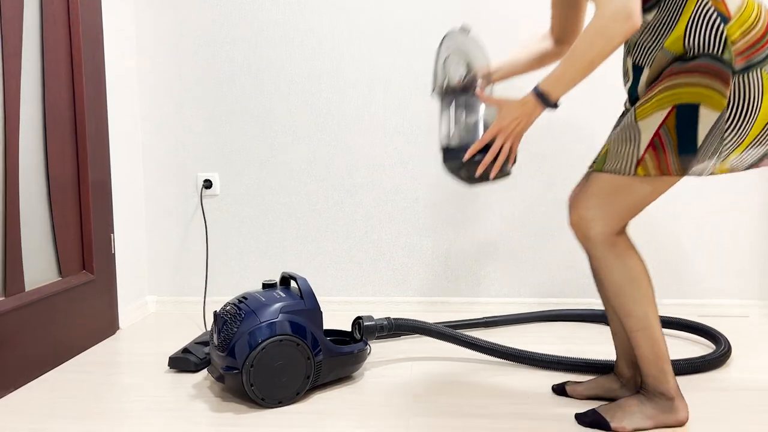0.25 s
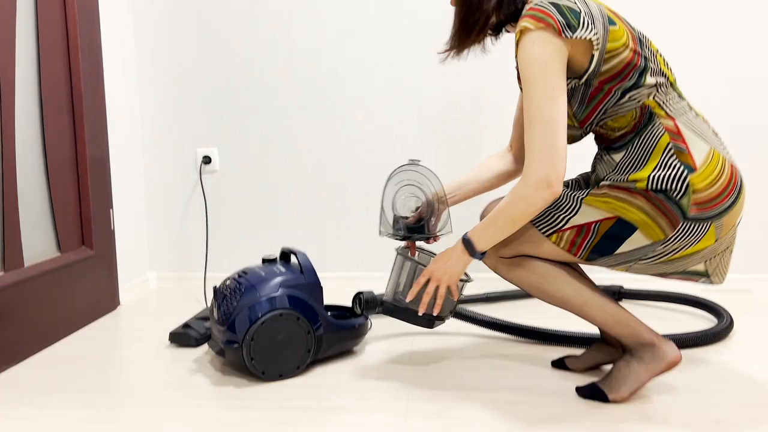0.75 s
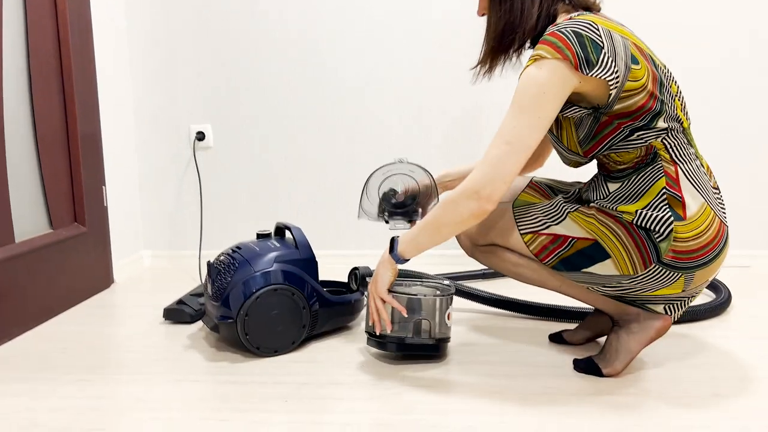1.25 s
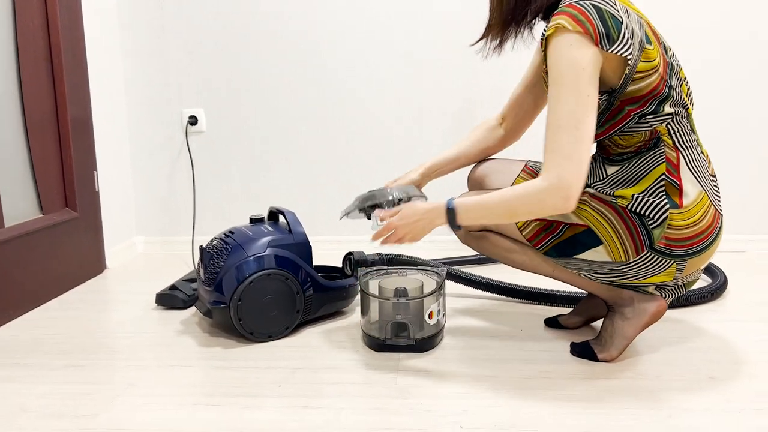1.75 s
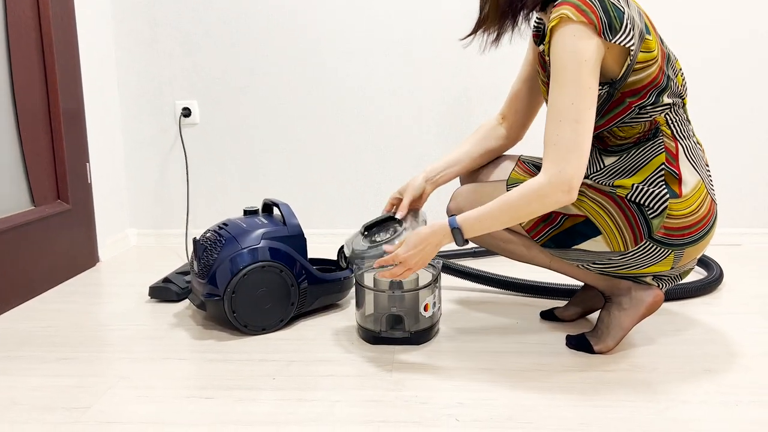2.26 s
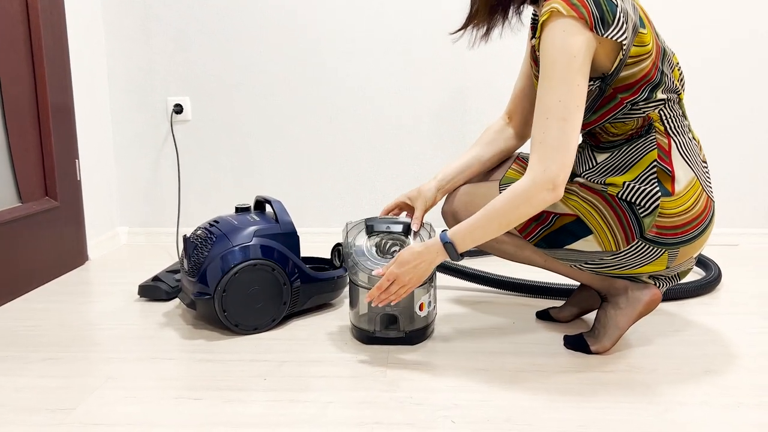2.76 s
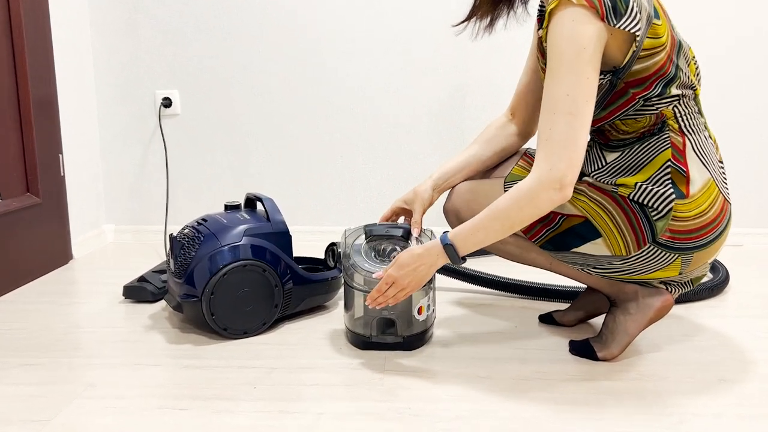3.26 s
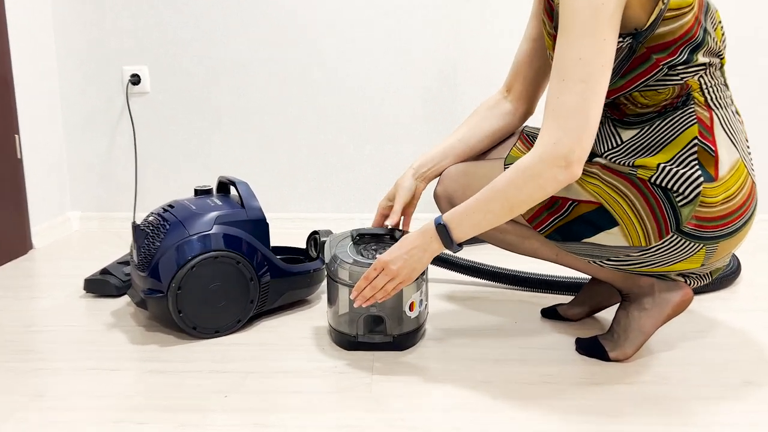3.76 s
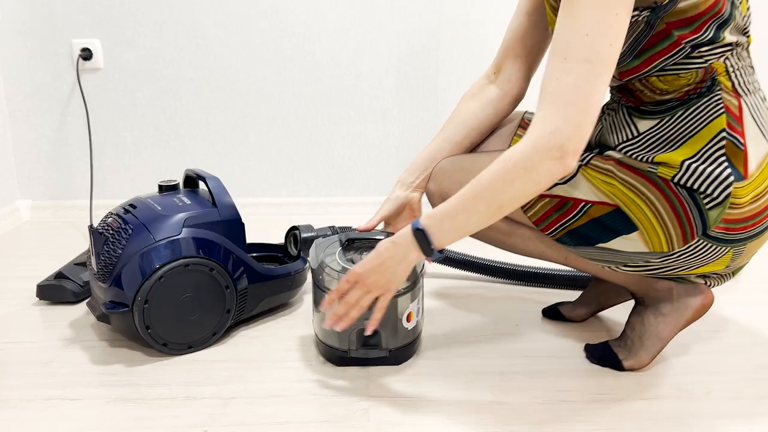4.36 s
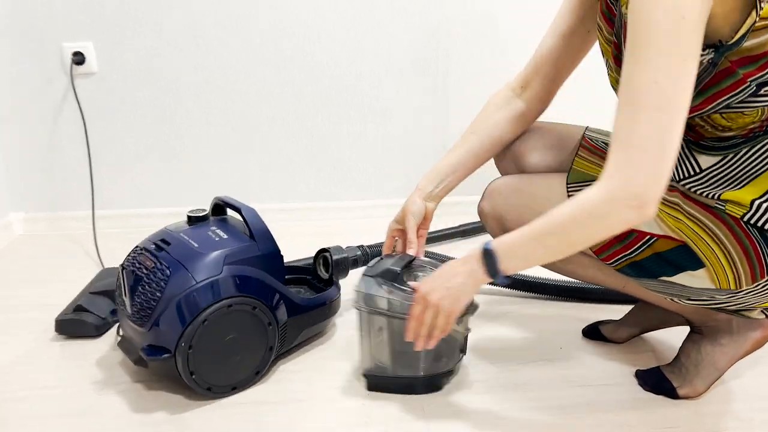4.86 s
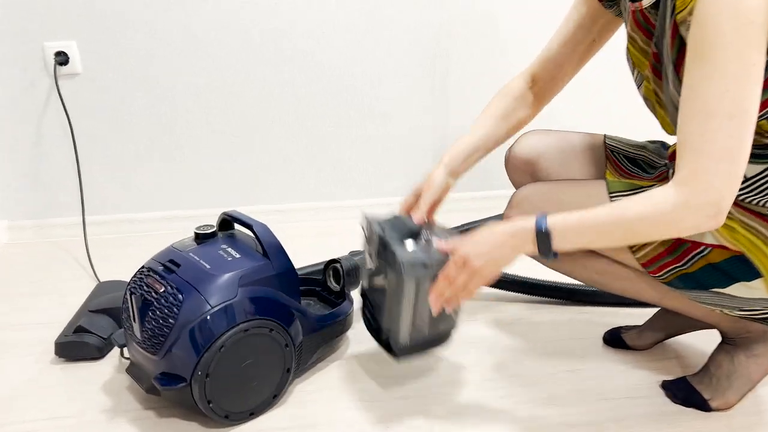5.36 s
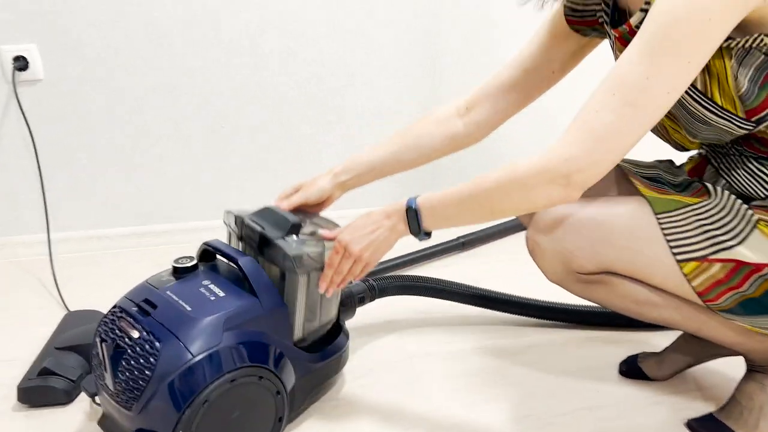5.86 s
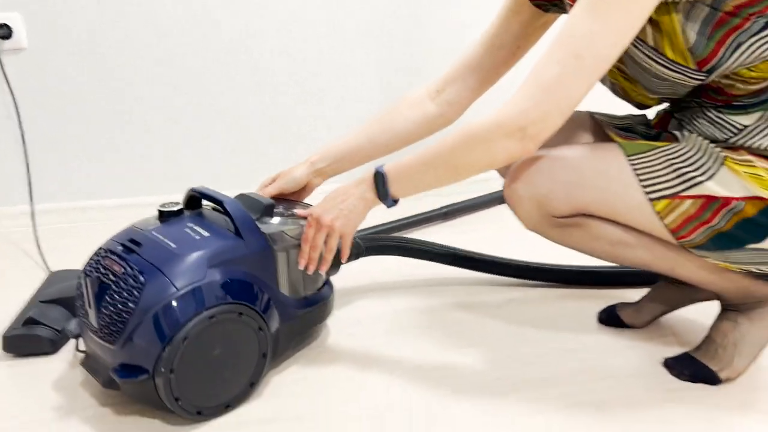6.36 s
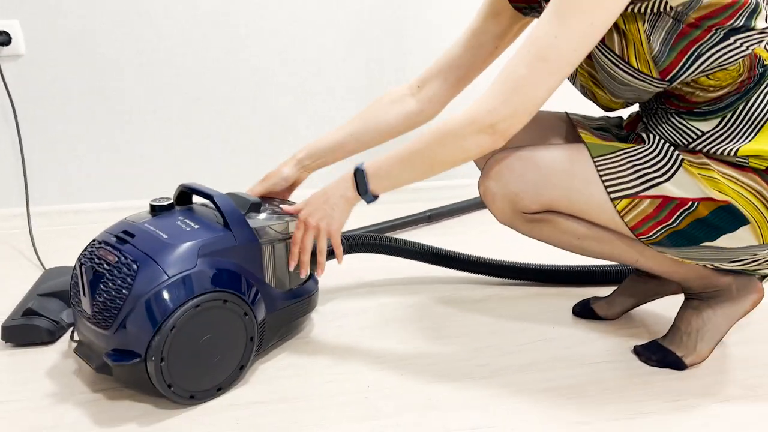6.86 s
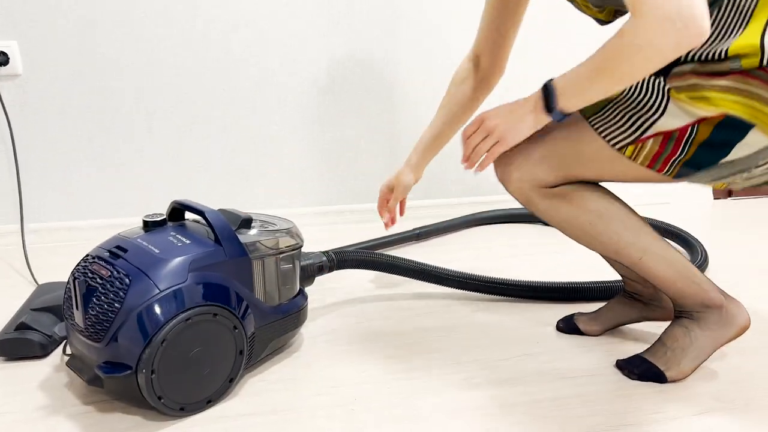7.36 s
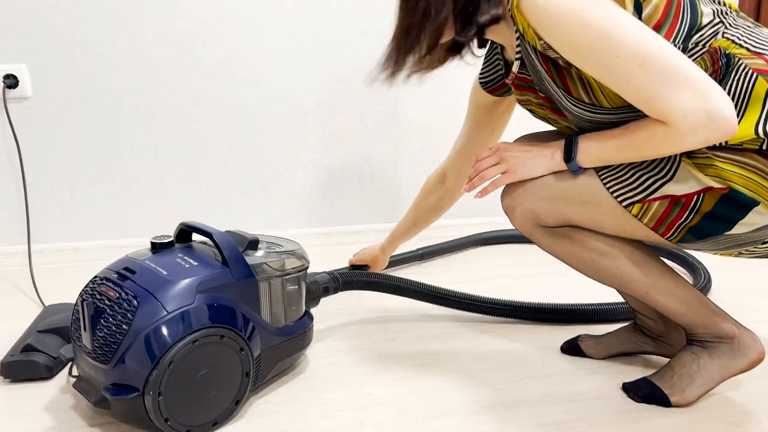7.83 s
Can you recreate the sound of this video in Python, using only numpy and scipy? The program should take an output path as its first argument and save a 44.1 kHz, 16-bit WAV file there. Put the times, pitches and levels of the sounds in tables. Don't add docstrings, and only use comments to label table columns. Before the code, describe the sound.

Low steady house hum in a small bare room with a short bright echo, captured close by a stereo phone. At 0 s a soft knock and rubbing, then faint rustles. Around 1.05-1.3 s loose plastic clatters in the hands, with a sharp bright crack at 1.13. At 1.5-1.65 s the hollow bin is set on laminate in a few dull, round thumps. From 2.0 to 2.55 s the lid is turned with light ticks and faint squeaks; quieter touches follow. Knocks at 3.6-3.85 s lead to a loud hollow snap at 4.04. Stiff clunks and rubbing continue from 4.35 to 5.27 s. The bin knocks the cleaner at 5.83, slides home with scraping clunks and sinking hollow notes at 6.0-6.2, and latches with a hard clack at 6.58. Near quiet, then hose clicks, squeals and rattles from 7.75 to the end around 8 s.

```python
import sys
import numpy as np
from scipy import signal
from scipy.fft import rfft, irfft, next_fast_len
from scipy.io import wavfile

SR = 44100
rng = np.random.default_rng(int(sys.argv[2]) if len(sys.argv) > 2 else 0)


def convert_level_to_amplitude(level_db):
    exponent = np.asarray(level_db, float) / 20
    return 10 ** exponent


def digitize_waveform(pressure):
    field = np.atleast_2d(pressure).T
    bounded = np.clip(field, -1, 1)
    quanta = np.round(bounded * 32767).astype(np.int16)
    wavfile.write(sys.argv[1], SR, quanta)


N = 356945

# pitch in Hz, level in dB, t60 in seconds.
BIN_BODY = [
    [(1360, 5.5, 0.01), (1563, 7.5, 0.014), (1670, -6, 0.017), (1805, -11, 0.011), (1850, -9, 0.1),
     (2070, -5.5, 0.0058), (2427, -9, 0.019), (2800, -10, 0.023)],
    [(60.6, -17.5, 0.12), (89.5, 6.5, 0.11)],
    [(166.4, -6.5, 0.23), (214, 9, 0.016), (298, 2.5, 0.035), (347, 1, 0.048)],
    [(504, -9, 0.016), (701, 0, 0.074), (871, 11, 0.0086), (1040, -9, 0.039)],
]
# rise in seconds, fall in seconds, trim in dB.
CONTACT_CHATTER = [
    (0.039, 0.0042, -1.5),
    (0.0087, 0.0044, -1.5),
    (0.017, 0.0045, -1.5),
    (0.0003, 0.0096, 1),
    (0.0092, 0.0035, 2.5),
]


def at_hz(points, hz):
    p = np.array(points, float)
    return np.interp(np.log(hz + 1), np.log(p[:, 0] + 1), p[:, 1])


def rms_one(x):
    return x / np.sqrt(np.mean(x ** 2) + 1e-20)


def shaped(x, spectrum):
    size = next_fast_len(N)
    hz = np.fft.rfftfreq(size, 1 / SR)
    inside = (hz > spectrum[0][0] * .7) & (hz < spectrum[-1][0] * 1.4)
    return irfft(rfft(x, size) * convert_level_to_amplitude(at_hz(spectrum, hz)) * inside, size)[..., :N]


def ring(force, hz, t60):
    r, w = convert_level_to_amplitude(-60 / (t60 * SR)), 2 * np.pi * hz / SR
    return signal.lfilter([.5, 0, -.5], [1, -2 * r * np.cos(w), r * r], force + 1e-18)


def grains(per_s, spread_db):
    sizes = convert_level_to_amplitude(spread_db * np.minimum(rng.exponential(1, N), 4)) * rng.choice([-1, 1], N)
    return sizes * (rng.random(N) < per_s / SR)


def swell(rows):
    attack_s, release_s = 0.019, 0.038
    t = np.arange(0, N + 32, 32) / SR
    start, length = np.transpose(rows)[:2, :, None]
    attack = np.clip((t - start) / attack_s + .5, 0, 1) ** 2
    return t, attack * np.exp(-np.maximum(t - start - length, 0) / release_s)


def contacts(hits, part, size):
    evenness = .2
    rise_s, fall_s, _ = CONTACT_CHATTER[part]
    t = np.arange(size // 4) / SR
    envelope = (1 - np.exp(-t / rise_s)) * np.exp(-t / fall_s)
    chatter = rng.standard_normal((len(hits), len(t))) ** 3 * envelope
    force = rfft(chatter / np.sqrt(np.sum(chatter ** 2, axis=1, keepdims=True)), size // 2)
    even = irfft(force / np.sqrt(np.abs(force) ** 2 + evenness))[:, :len(t)]
    return rfft(even / np.sqrt(np.sum(even ** 2, axis=1, keepdims=True)), size)


def struck(hits, body, size=4096):
    # frequency in Hz, level in dB per Hz.
    tick_spectrum = [(300, -51.5), (2500, -2.5), (3500, 1), (5000, -0.5), (6000, -5), (7300, -2.5),
                     (10000, -9.5), (13000, -9.5), (15500, -19.5), (16500, -46)]
    hits, hz = np.array(hits), np.fft.rfftfreq(size, 1 / SR)
    tick_level = convert_level_to_amplitude(28.0 + at_hz(tick_spectrum, hz) + hits[:, [5]])
    blows = tick_level * contacts(hits, part=4, size=size)
    for part, modes in enumerate(body):
        trim_db = CONTACT_CHATTER[part][2]
        for mode_hz, db, t60 in modes:
            chance = rng.standard_normal((len(hits), 2))
            f = mode_hz * (1 + .02 * chance[:, :1])
            decay = np.log(1000) / t60 / (2 * np.pi)
            force = contacts(hits, part, size)
            near = np.abs(force[:, np.abs(hz - mode_hz) < 3 * decay + 12])
            force = force / np.sqrt(np.mean(near ** 2, axis=1, keepdims=True))
            force = force / (1 + 1j * hz / (2 * f)) ** 2
            level = convert_level_to_amplitude(hits[:, [1 + part]] + trim_db + db + 2.0 * chance[:, 1:])
            resonance = 1j * hz / (f ** 2 - hz ** 2 + 2j * decay * hz)
            blows += force * level * SR / (2 * np.pi) * resonance
    out = np.zeros(N + size)
    for s, blow in zip(hits[:, 0], irfft(blows, size)):
        start = round(s * SR)
        out[start:start + size] += blow
    return out[:N]


def held(hits, grip):
    # wall's share of weight against slap from 0 to 1,
    # wall level in dB, floor level in dB relative to the weight.
    grips = dict(walked_in=(0.73, 4, -39), carried=(0.26, -1.1, -2), set_down=(0.83, 0.5, -0.45),
             lid_turned=(0.53, 5.3, -24), lid=(0.26, 0, -1), bin=(1, -14.5, -15), seated=(0.13, 6.3, -10),
             latched=(0.085, -8.5, -12), hose=(0.089, 0.98, 9.6))
    s, slap, weight, edge = np.transpose(hits)
    share, wall_db, floor_db = grips[grip]
    wall = slap + share * (weight - slap) + wall_db
    return np.transpose([s, slap, weight + floor_db, weight, wall, edge])


def judder(slides, modes, per_s):
    t, shape = swell(slides)
    push = np.interp(np.arange(N) / SR, t, convert_level_to_amplitude(np.array(slides)[:, 2]) @ shape)
    knocks = sum(convert_level_to_amplitude(db) * ring(grains(per_s, spread_db=-1.5), hz, t60) for hz, db, t60 in modes)
    return push * rms_one(knocks)


def swelling_notes(rows):
    rise_cycles = 0.51
    out, t = np.zeros(N + SR // 2), np.arange(SR // 2) / SR
    for s, db, hz, t60 in rows:
        start = round(s * SR)
        envelope = convert_level_to_amplitude(db - 60 * t / t60) * (1 - np.exp(-t * hz / rise_cycles))
        out[start:start + len(t)] += envelope * np.sin(2 * np.pi * hz * t)
    return convert_level_to_amplitude(1.5) * out[:N]


def house_hum():
    # frequency in Hz, level in dB per Hz.
    hum_spectrum = [(20, 11.5), (60, 2), (170, -13), (500, -11.5), (860, -11.5), (1200, -4.5), (1550, -16),
                    (1900, -22.5), (2600, -35.5)]
    return convert_level_to_amplitude(-64) * rms_one(shaped(rng.standard_normal((2, N)), hum_spectrum))


def rubbing():
    # start in
    # seconds, length in seconds, level in dB, lightness in dB (crisp above 0, heavy below).
    strokes = [(0, 0.0029, -47.5, -1), (.09, 0.021, -55, -4), (0.161, 0.07, -57.5, 5.5),
               (0.409, 0.032, -65, 4), (0.506, 0.11, -72, 17), (0.678, 0.059, -77.5, 12),
               (0.816, 0.16, -76.5, 11), (1.052, 0.049, -48, 4), (1.19, 0.23, -55.5, -6),
               (1.51, 0.21, -67.5, -15.5), (2.04, 0.16, -60, 10), (2.3, 0.38, -66, 4.5),
               (3.62, 0.144, -63, 0), (3.709, 0.055, -46.5, 0.5), (3.84, 0.094, -52, 1),
               (4.11, 0.34, -53, 0), (4.5, 0.4, -57.5, -3), (4.951, 0.17, -52, -7.5),
               (5.179, 0.082, -54.5, -1.5), (5.33, 0.16, -66, 3), (5.706, 0.088, -58.5, 4.5),
               (5.86, 0.076, -50.5, -6), (5.99, 0.21, -46, -5.5), (6.2, 0.053, -66, -11),
               (6.701, 0.21, -59.5, -2.5), (7.769, 0.069, -47, 1), (7.86, 0.15, -58, -10),
               (7.97, .2, -52, -6.5),
               (2.716, 0.048, -63, -8.5), (2.876, 0.23, -70, -5), (3.184, 0.19, -74.5, -12),
               (3.43, 0.47, -73, -7), (4.337, 0.038, -74, 13), (4.584, 0.0047, -72, -4),
               (4.783, 0.011, -53, 0), (4.872, 0.067, -62, 10), (4.99, 0.0074, -63.5, -17),
               (5.447, 0.34, -72, 3), (6.302, 0.42, -72.5, -6), (7.057, 0.21, -79.5, 11.5),
               (7.72, 0.047, -80.5, 15), (7.402, 0.12, -84.5, 10), (7.55, 0.049, -79, 11),
               (1.767, 0.32, -81.5, 7)]
    # pitch in Hz, width in Hz, level in dB.
    rub_modes = [(434, 620, 4.5), (613, 57, 8), (970, 200, 7), (1110, 930, 3), (1400, 140, 12.5)]
    # frequency in Hz, level in dB per Hz.
    rustle_spectrum = [(1700, 4.5), (2100, -4.5), (3000, 1.5), (4600, -3.5), (6000, -5.5), (9000, -6.5),
                       (13000, -9), (14500, -8.5), (15700, -23)]
    shuffle_db, rub_db, rustle_db = -5.5, -4.5, -8.5
    stir_db = -76.5
    moves = strokes
    t, shape = swell(moves)
    db, light = np.transpose(moves)[2:]

    def effort(tilt):
        return np.interp(np.arange(N) / SR, t, convert_level_to_amplitude(stir_db) + convert_level_to_amplitude(db + tilt * light) @ shape)

    heavy, middle, crisp = effort(-1), effort(0), effort(1)
    shuffle = shaped(grains(per_s=700, spread_db=1.5),
                     [(50, -1.0), (90, 5.5), (200, -5.0), (320, 5.5), (420, -1.0)])
    slips = grains(per_s=750, spread_db=4.5)
    rub = 0
    for k, (hz, width, mode_db) in enumerate(rub_modes):
        rub = rub + (-1) ** k * convert_level_to_amplitude(mode_db) * ring(slips, hz, 2.0 / width) * np.sqrt(width)
    rustle = shaped(grains(per_s=4500, spread_db=-2.5), rustle_spectrum)
    out = convert_level_to_amplitude(shuffle_db) * heavy * rms_one(shuffle)
    out = out + convert_level_to_amplitude(rub_db) * middle * rms_one(rub)
    return out + convert_level_to_amplitude(rustle_db) * crisp * rms_one(rustle)


def carried_notes():
    # start in seconds, level in dB, pitch in Hz, t60 in seconds.
    lid_notes = [(.002, -39, 338, 0.11), (.003, -43, 660, 0.12), (.35, -52.5, 260, 0.11),
                 (.69, -54.5, 169, 0.043), (1.092, -46, 250, 0.17), (1.1325, -19, 1140, 0.018),
                 (1.1325, -24, 686, 0.029), (1.1325, -18, 2340, 0.017), (2.54, -57, 250, 0.12),
                 (2.709, -44, 347, 0.16), (2.709, -37, 553, 0.067), (3.022, -50, 345, 0.14),
                 (3.02, -48, 557, 0.071), (3.184, -48, 345, 0.18), (3.579, -39, 946, 0.065),
                 (3.688, -27.5, 354, 0.047), (3.69, -35, 455, 0.27), (3.69, -32.5, 950, .05),
                 (3.735, -33, 980, .04), (3.847, -34.5, 1900, .06), (3.846, -46, 510, 0.073)]
    return swelling_notes(lid_notes)


def empty_bin():
    # time in seconds, slap in dB, weight in dB, edge in dB.
    walked_in = [(0.004, -45.5, -35, -63.5), (0.115, -63, -43.5, -80), (0.259, -67, -64, -51),
                 (0.36, -77, -52, -90), (0.699, -58, -84, -59.5)]
    carried = [(1.0425, -35.5, -71, -41.5), (1.132, -17.5, -35, -35.5), (1.15, -31, -52, -45.5),
               (1.2788, -35.5, -37, -27.5), (1.288, -31, -35, -35.5), (1.305, -28.5, -36.5, -37.5)]
    set_down = [(1.4908, -42, -27, -49), (1.5494, -52, -29.5, -58), (1.6017, -74, -29, -63),
                (1.639, -95, -45, -71), (1.717, -104, -42.5, -70), (1.756, -73, -53, -80),
                (1.92, -57, -58.5, -58)]
    lid_turned = [(2.033, -51.5, -57, -44), (2.049, -46.5, -51.5, -44.5), (2.0975, -46, -65, -45.5),
                  (2.151, -56, -58, -69), (2.1988, -49, -72, -49), (2.249, -53, -77, -75),
                  (2.3674, -51, -84, -45.5), (2.5411, -46, -69, -37.5)]
    # start in seconds, length in seconds, level in dB.
    bin_slides = [(1.53, 0.15, -60)]
    # pitch in Hz, level in dB, t60 in seconds.
    loose_body = [
        [(1660, 16.5, 0.0024), (1973, -1.5, 0.038), (2300, 0, 0.0044), (3010, 2.5, 0.006), (3250, -6, 0.018),
         (4020, -15, 0.0059), (1504, 2.5, 0.054)],
        [(60.6, 2, 0.14), (84, 3, 0.068), (123.3, 1, 0.13)],
        [(155, -38, 0.028), (260, 1.5, 0.047), (349, -5.5, 0.065)],
        [(478, -33, .02), (590, 4.5, 0.019), (810, 1.5, 0.0092), (1140, -5, 0.016)],
    ]
    # pitch in Hz, level in dB, t60 in seconds.
    airborne_body = [
        [(1430, 7.5, 0.0045), (1680, 4.5, 0.008), (2340, 7.5, 0.0037), (2806, 4, 0.0046), (3410, 5, 0.008),
         (4300, 2, 0.0039), (5030, -8, 0.0013)],
        [(62.3, 2, 0.17), (110, -6, 0.081)],
        [(163.6, -11.5, .04), (250, 4, 0.051), (370, -6.5, 0.13)],
        [(480, -20.5, 0.017), (620, 4, 0.016), (900, -3.5, 0.017), (1140, 6, 0.015)],
    ]
    loose = np.vstack([held(walked_in, "walked_in"), held(set_down, "set_down"),
                       held(lid_turned, "lid_turned")])
    knocks = struck(loose, loose_body) + struck(held(carried, "carried"), airborne_body)
    return knocks + judder(bin_slides, loose_body[2], per_s=380.0)


def squeals():
    # start in seconds, length in seconds, level in dB, pitch in Hz.
    drags = [(0.377, 0.016, -57.5, 880), (0.403, 0.012, -57.5, 1580), (0.412, 0.02, -79, 2650),
             (0.696, 0.051, -68.5, 1170), (0.803, 0.052, -63, 1250), (2.176, 0.077, -61.5, 585),
             (2.142, 0.15, -65.5, 1680), (7.796, 0.015, -42, 3820), (7.784, 0.022, -51, 4900),
             (7.831, 0.02, -49, 3250), (7.898, 0.048, -51.5, 2040), (8.054, 0.04, -47, 760)]
    ring_cycles = 18
    t, shapes = swell(drags)
    slips = grains(per_s=2100, spread_db=3.0)
    out = 0
    for shape, (_, _, db, hz) in zip(shapes, drags):
        push = np.interp(np.arange(N) / SR, t, shape)
        out = out + convert_level_to_amplitude(db) * push * rms_one(ring(slips, hz, ring_cycles / hz))
    return out


def cracks():
    # start in seconds, level in dB, pitch in Hz, t60 in seconds.
    edge_cracks = [(0.805, -55.5, 1800, .04), (0.806, -60, 2820, .03), (1.1324, -20.5, 4300, 0.0019),
                   (1.1328, -22, 3100, 0.006), (1.133, -19, 1460, 0.0068), (1.4935, -31.5, 4500, 0.0034),
                   (1.923, -60, 4950, 0.022), (2.368, -39.5, 6300, 0.0054), (2.533, -50, 7500, 0.0027),
                   (2.5412, -30.5, 5100, .006), (2.5415, -32.5, 2200, 0.0049), (3.582, -37, 1320, 0.024),
                   (3.692, -34, 1330, 0.013), (3.74, -38, 1150, .015), (3.593, -35, 2450, 0.0068),
                   (3.737, -29, 3440, 0.0085), (3.85, -39, 3090, 0.026), (4.352, -32, 1840, 0.022),
                   (4.599, -23, 1560, 0.028), (4.601, -34, 2690, 0.013), (4.792, -37, 1630, 0.03),
                   (5.056, -25.5, 1590, 0.025), (5.057, -33.5, 2640, 0.014), (5.137, -43, 1760, 0.014),
                   (5.268, -41.5, 3460, 0.0069), (7.7575, -31, 4830, 0.0088), (7.8135, -25, 3860, 0.01),
                   (7.989, -24, 3620, 0.0042), (7.893, -32, 2300, 0.011), (7.807, -30, 3640, 0.0093)]
    return swelling_notes(edge_cracks)


def bin_notes():
    # start in seconds, level in dB, pitch in Hz, t60 in seconds.
    air_notes = [(1.052, -47.5, 250, 0.5), (1.285, -42, 370, 0.34), (1.496, -25, 338, 0.042),
                 (1.51, -27, 155, 0.048), (1.545, -33, 855, .03), (1.601, -21, 336, 0.034),
                 (1.634, -26, 338, 0.023), (4.07, -30, 211, 0.54), (4.379, -13, 220, 0.034),
                 (4.585, -35, 266, 0.12), (4.79, -23, 231, 0.057), (4.81, -31, 176, 0.22),
                 (4.048, -4.5, 229.6, 0.049), (4.981, -36, 334, 0.048), (4.993, -17, 168, 0.052),
                 (5.055, -28.5, 260, 0.042), (5.139, -27.5, 234, 0.039)]
    return swelling_notes(air_notes)


def thuds():
    # time in seconds, level in dB.
    floor_pushes = [(1.159, -34.5), (3.239, -49), (1.791, -50), (4.379, -35.5), (4.751, -32), (4.801, -30),
                    (4.997, -41), (6.3, -56), (5.0527, -37.5), (6.111, -31), (6.138, -29), (6.582, -25),
                    (7.915, -39)]
    silent = -200
    hits = [(s, silent, db, silent, silent, silent) for s, db in floor_pushes]
    return struck(hits, [[], BIN_BODY[1]])


def closing_bin():
    # time in seconds, slap in dB, weight in dB, edge in dB.
    lid_hits = [(2.7076, -52, -47.5, -56), (2.992, -60, -54, -78), (3.0205, -62.5, -47.5, -88),
                (3.1864, -60, -57, -77), (3.2114, -47, -49, -83), (3.58, -37.5, -44, -61),
                (3.6866, -35.5, -43.5, -50.5), (3.7345, -37, -41.5, -40), (3.8441, -39.5, -80, -45)]
    # time in seconds, slap in dB, weight in dB, edge in dB.
    bin_hits = [(3.995, -41.5, -45, -55.5), (4.034, -26.5, -34, -51), (4.0436, -11, -9.5, -26),
                (4.0617, -24.5, -42, -58), (4.1307, -33.5, -57, -63), (4.3526, -35.5, -37.5, -63),
                (4.3754, -27, -23.5, -49.5), (4.588, -41, -39, -55), (4.5969, -24, -36.5, -45.5),
                (4.782, -39, -44, -57), (4.7886, -28, -30, -47.5), (4.982, -37, -35, -51),
                (4.9911, -31.5, -40.5, -65), (5.0547, -33, -40, -50), (5.1358, -34, -33.5, -53),
                (5.2627, -50, -57, -49.5)]
    # pitch in Hz, level in dB, t60 in seconds.
    lid_body = [
        [(1480, 16.5, 0.0083), (1800, -3, 0.019), (2064, -5.5, 0.0065), (2510, 2, 0.0073)],
        [(70, 0.5, 0.077), (109.4, 5, 0.042)],
        [(345, -5.5, 0.043), (395.4, -1, 0.022)],
        [(487, 9.5, 0.0078), (950, 4, 0.022), (1150, 9, 0.019)],
    ]
    return struck(held(lid_hits, "lid"), lid_body) + struck(held(bin_hits, "bin"), BIN_BODY)


def cleaner():
    # time in seconds, slap in dB, weight in dB, edge in dB.
    seated = [(5.737, -46.5, -75, -57), (5.831, -24.5, -29.5, -34), (5.8429, -55, -21, -67),
              (5.9782, -27.5, -113, -40.5), (6.0038, -24, -65, -48), (6.0224, -30.5, -28, -38.5),
              (6.0457, -27.5, -26, -70), (6.1102, -29, -35.5, -48), (6.1376, -49, -27.5, -62),
              (6.1848, -33, -24, -53)]
    latched = [(6.562, -51, -32, -74.5), (6.5716, -25, -21, -37), (6.5809, -8, -32, -17.5),
               (6.5904, -8, -51, -33), (6.6078, -25, -29, -39), (6.876, -59, -48, -59),
               (6.883, -42.5, -36.5, -71.5), (6.934, -62.5, -46.5, -77)]
    hose_hits = [(7.031, -80, -79, -79), (7.555, -69, -79, -65.5), (7.938, -70, -82, -46.5),
                 (7.7555, -53, -62.5, -41), (7.811, -34.5, -71, -42), (7.892, -35, -62, -65),
                 (7.9436, -34.5, -46, -55), (7.9878, -30.5, -40, -42.5), (8.0098, -37, -43, -48),
                 (8.0674, -68, -51, -59)]
    # start in seconds, length in seconds, level in dB.
    housing_slides = [
        (5.99, 0.14, -54),
        (7.99, 0.083, -48.5),
    ]
    # pitch in Hz, level in dB, t60 in seconds.
    housing_body = [
        [(1250, 7.5, 0.0061), (1590, -2, 0.016), (1800, -1.5, 0.012), (2200, -13.5, 0.0071), (2356, -5, 0.014),
         (2790, 2.5, 0.0045)],
        [(60, -23, 0.043), (97.8, -1.5, 0.072)],
        [(219, 4.5, 0.064), (252, -9.5, 0.028), (377, -10.5, 0.027)],
        [(520, 2, 0.012), (740, 5, 0.0099), (1052, -7.5, 0.0068), (1102, -15, 0.13)],
    ]
    # pitch in Hz, level in dB, t60 in seconds.
    catch_body = [
        [(1300, 1, 0.01), (1600, 2.5, .015), (1800, -3, 0.0058), (1950, -11, 0.023), (2450, -8.5, 0.01),
         (3480, -3.5, .005)],
        [(60, -20, .04), (93, -3.5, 0.11)],
        [(215, 1, 0.039), (260, -8.5, 0.071), (393, -6.5, 0.062)],
        [(530, 5.5, .02), (750, -2, 0.021), (1136, 2.5, 0.024)],
    ]
    housing = np.vstack([held(seated, "seated"), held(hose_hits, "hose")])
    knocks = struck(housing, housing_body) + struck(held(latched, "latched"), catch_body)
    return knocks + judder(housing_slides, housing_body[3], per_s=240.0)


def socket_notes():
    # start in seconds, level in dB, pitch in Hz, t60 in seconds.
    sinking_notes = [(5.834, -28, 1840, 0.032), (5.839, -18.5, 231.5, 0.092), (5.84, -28.5, 213, 0.26),
                     (5.979, -31, 1013, 0.079), (6.004, -22, 900, 0.045), (6.013, -25.5, 810, 0.058),
                     (6.039, -34, 215, 0.099), (6.111, -22.5, 813, 0.043), (6.139, -30.5, 740, .04),
                     (6.186, -23, 555, 0.043), (6.193, -29.5, 210.7, 0.41), (6.193, -32, 225, 0.26),
                     (6.216, -30, 563, 0.048), (6.582, -13.5, 215, 0.041), (6.621, -33, 210, 0.23),
                     (6.878, -41, 260, 0.052)]
    return swelling_notes(sinking_notes)


def room(x):
    # centre in Hz, t60 in seconds, level in dB.
    tail_bands = [(250, 0.39, 3.5), (443, 0.33, 8), (910, 0.38, 8.5), (1960, 0.39, 7.5), (4680, 0.42, 5.5),
                  (7650, 0.32, 3), (17400, 0.036, 6)]
    # pitch in Hz, level in dB, t60 in seconds.
    standing_modes = [(49.3, -7, 0.21), (79.6, -11, 0.23), (112.5, -11.5, 0.18), (163.9, -9.5, 0.12),
                      (221, -12.5, 0.13), (342, -6, 0.026)]
    tail_db, standing_db, first_echo_s = 8.5, -42, 0.0072
    t = np.arange(SR // 2) / SR
    noise, tail = rng.standard_normal((2, len(t))), 0
    for band_hz, t60, db in tail_bands:
        limits = [band_hz / np.sqrt(2), min(band_hz * np.sqrt(2), .45 * SR)]
        band = signal.butter(2, limits, "band", fs=SR, output="sos")
        tail = tail + signal.sosfilt(band, noise) * convert_level_to_amplitude(db - 60 * t / t60) / np.sqrt(t60 * SR)
    tail = tail * np.clip(t / first_echo_s - .5, 0, 1)
    diffuse = signal.fftconvolve(x[None], tail, axes=1)[:, :N]
    standing = sum(convert_level_to_amplitude(db) * ring(x, hz, t60) for hz, db, t60 in standing_modes)
    return convert_level_to_amplitude(tail_db) * diffuse + convert_level_to_amplitude(standing_db) * standing * [[1], [.3]]


def ports(shared, other):
    # frequency in Hz, phase in radians by which left leads.
    port_phase = [(0, -.6), (300, -.5), (520, -.2), (860, -1), (1550, -1.9), (1810, .2), (2670, .9),
                  (4740, .5), (5680, -1.2), (6460, 0), (7490, -.2), (9800, -3.14), (10900, -3.7),
                  (12400, -6.2), (13700, -6.5), (15800, -9.4)]
    # frequency in Hz, left minus right in dB.
    port_balance = [(60, -6), (170, -3), (500, 1), (900, 4), (1550, -2), (2100, 2), (3700, 5.5), (5500, 2),
                    (7200, 0.5), (16000, -1.5)]
    # frequency in Hz, likeness of the ports from 0 to 1.
    port_likeness = [(60, 0.9), (200, 0.5), (600, 0.2), (1300, 0.7), (1900, 0.8), (3500, 1), (5400, 0.3),
                     (7000, 1), (16000, 0.5)]
    size = next_fast_len(N + 4096)
    hz = np.fft.rfftfreq(size, 1 / SR)
    alike = np.clip(at_hz(port_likeness, hz), 0, 1)
    turn = np.exp(.5j * np.interp(hz, *np.transpose(port_phase)))
    half = convert_level_to_amplitude(at_hz(port_balance, hz) / 2) * turn
    a = rfft(shared, size) * np.sqrt(1 + alike)
    b = rfft(other, size) * np.sqrt(1 - alike)
    return irfft([(a + b) * half, (a - b) / half], size)[:, :N] / np.sqrt(2)


def scene():
    note_room_db = -7
    field = house_hum()
    handled = rubbing() + empty_bin() + squeals() + cracks()
    closed = thuds() + closing_bin()
    places = [(handled, .4, carried_notes()),
              (closed, .55, bin_notes()),
              (cleaner(), .9, socket_notes())]
    for source, lean, hollow in places:
        direct = (source + hollow) * [[1], [lean]]
        field = field + direct + room(source + convert_level_to_amplitude(note_room_db) * hollow)
    return ports(*field)


def low_pass(x):
    return signal.sosfilt(signal.butter(12, 16470, fs=SR, output="sos"), x)


def record(dry):
    bass_cut = signal.butter(2, 79, "high", fs=SR, output="sos")
    heard = signal.sosfilt(bass_cut, dry)
    return low_pass(0.91 * np.tanh(heard / 1.004))


dry = scene()
out = record(dry)
digitize_waveform(out)
```